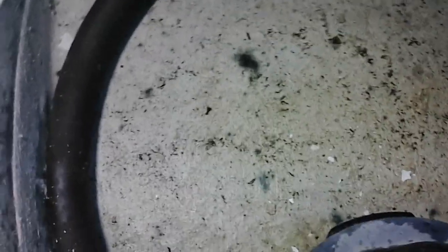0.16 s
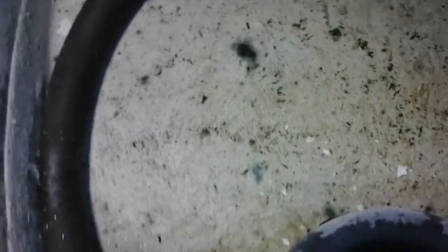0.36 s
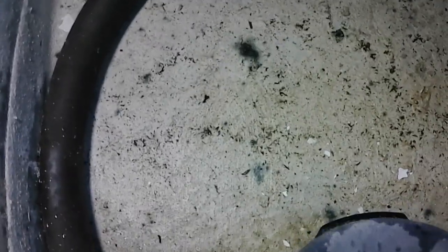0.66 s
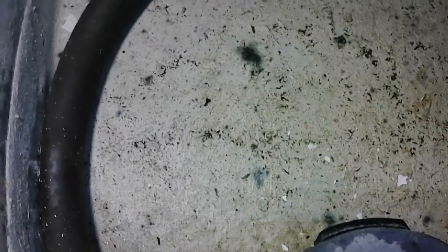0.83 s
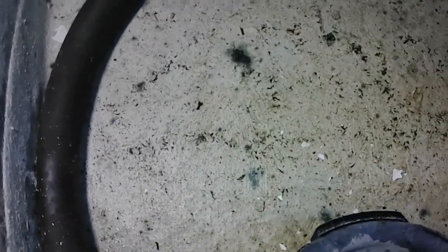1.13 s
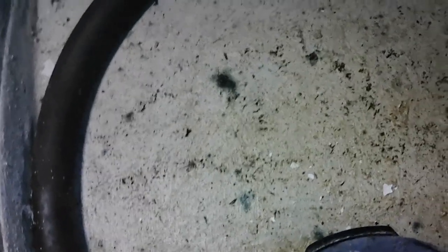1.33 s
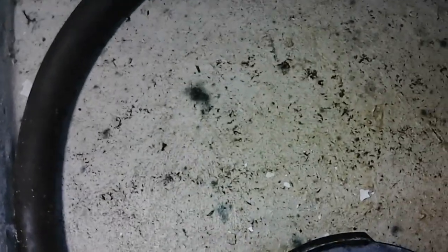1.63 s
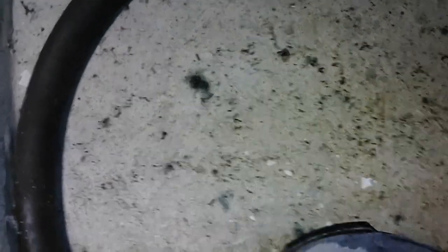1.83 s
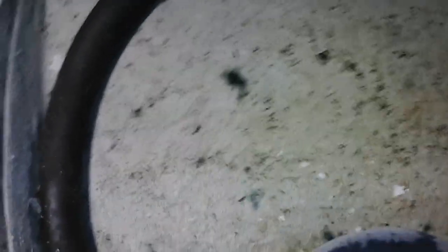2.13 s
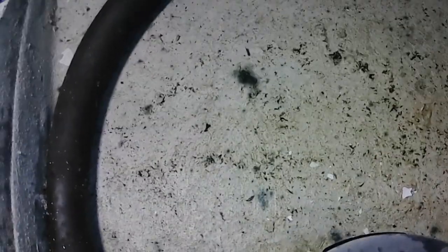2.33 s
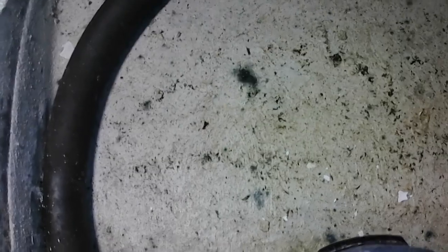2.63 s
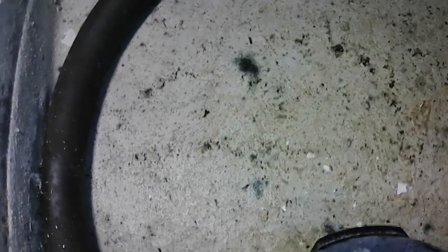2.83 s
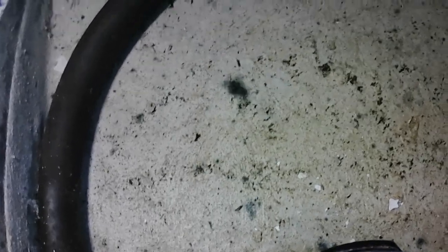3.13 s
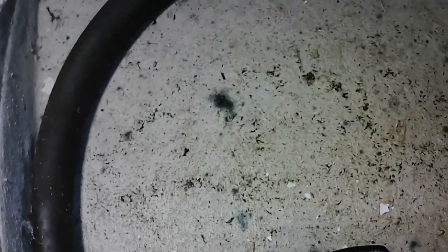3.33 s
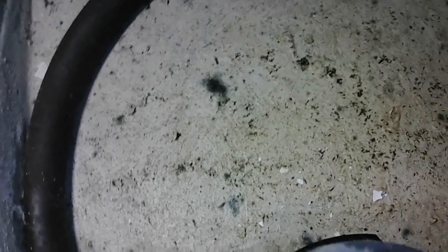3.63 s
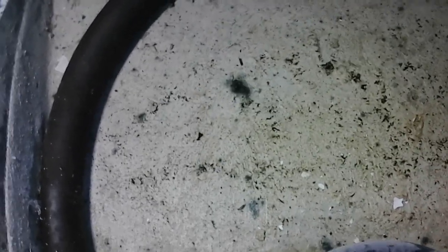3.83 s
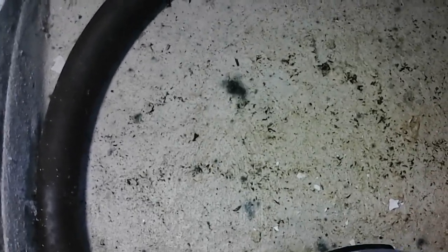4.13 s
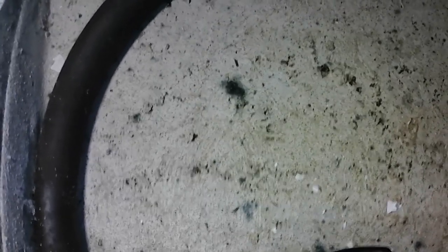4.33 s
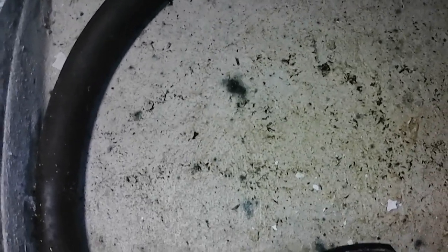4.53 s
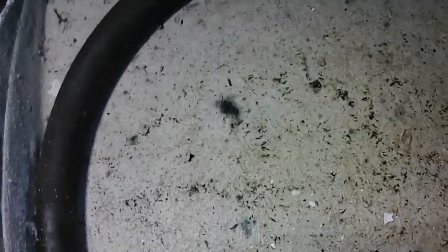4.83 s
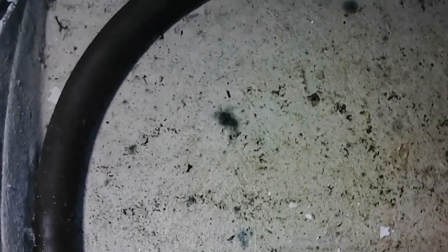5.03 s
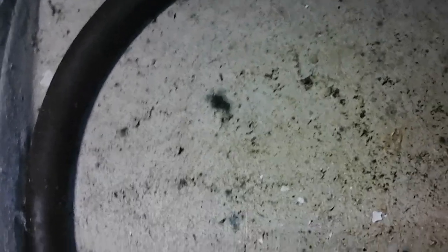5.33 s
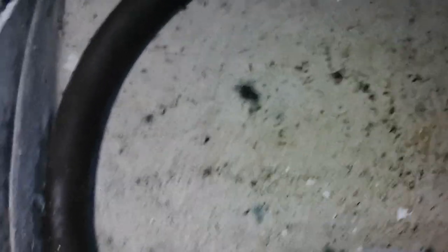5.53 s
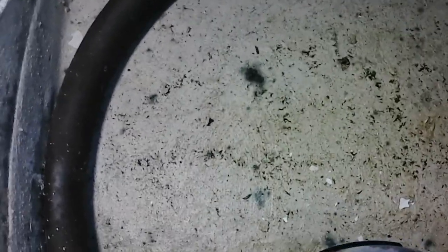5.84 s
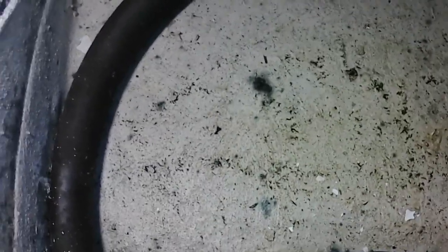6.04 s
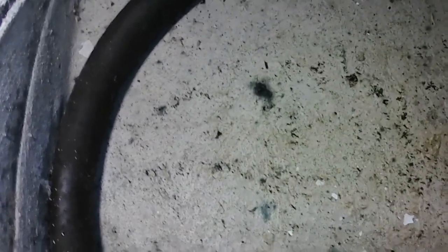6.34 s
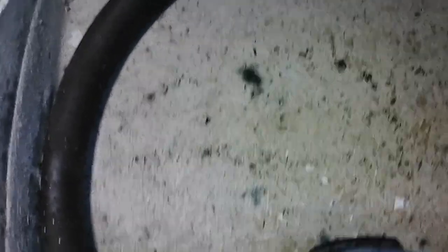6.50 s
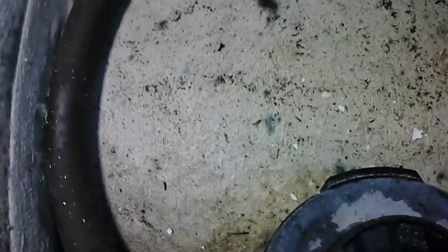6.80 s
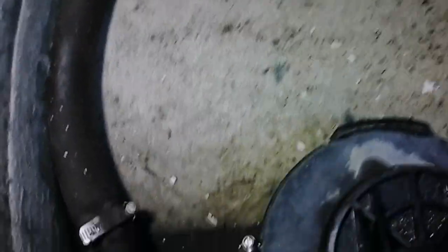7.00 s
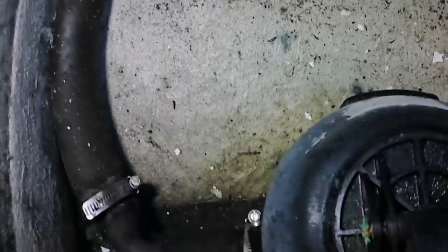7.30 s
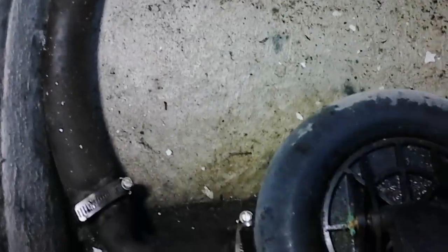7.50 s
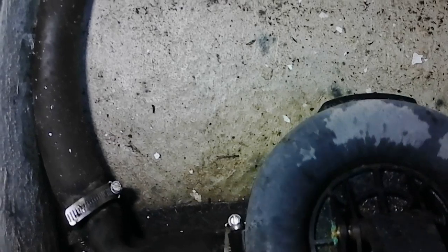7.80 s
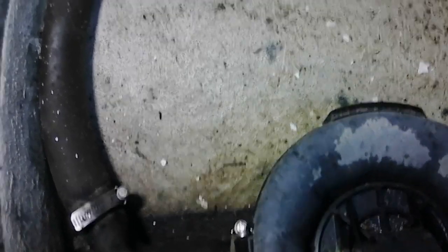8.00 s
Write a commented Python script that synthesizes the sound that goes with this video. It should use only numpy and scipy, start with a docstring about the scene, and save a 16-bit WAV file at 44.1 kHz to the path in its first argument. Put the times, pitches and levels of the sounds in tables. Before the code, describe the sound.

A hand pump draws water through a hose in a boat's bilge, with irregular hollow knocks, gurgling, hissing and sloshing.

```python
"""A hand-worked diaphragm pump down in a boat's bilge, one microphone close by under the deck.
Water is already gurgling and hissing through the hose as the lever knocks the hollow housing;
water sloshes, linkage and grit tick. From 0.8 s the outlet flap slaps open about every 1.8 s,
each stroke pushing out more bubbly water. The hardest knocks, near 2 s and 7.3 s, overload the input."""
import sys
import numpy as np
from scipy import signal
from scipy.fft import rfft, irfft, next_fast_len
from scipy.io import wavfile
from scipy.ndimage import uniform_filter1d

SR = 44100
rng = np.random.default_rng(int(sys.argv[2]) if len(sys.argv) > 2 else 0)


def store_pcm(level_fs):
    """Save levels as 16-bit WAV."""
    pcm = np.round(np.clip(level_fs, -1, 1) * 32767).astype(np.int16)
    wavfile.write(sys.argv[1], SR, np.atleast_2d(pcm).T)


N = 359856

# air pockets of hose and chamber: pitch_hz, nominal_width_hz, level_db
AIR_POCKETS = [(575, 200, 4), (631.5, 18.4, 5.5), (982, 122, 21), (1246, 90, 6.5), (1735, 95, 4),
               (1990, 110, 4)]
# lever stops and jolts of the housing: start_s, peak_db, hardness_db_per_octave, gush_db
LEVER_KNOCKS = [(0.04, -12, -1.5, -42), (0.098, -10.5, -5.5, -58), (0.26, -3.5, -4.5, -45),
                (0.712, -14, 0, -28), (0.936, -10, -4, -25), (1.116, -8.5, -7, -60), (1.2, -11.5, -5, -43),
                (1.856, -6.5, -5, -21), (2.002, -11.5, -3.5, -7.5), (2.008, 5, -3, -23),
                (2.49, -14.5, -2, -30), (2.745, -11.5, -5, -50), (2.889, -8, -4.5, -21),
                (2.988, -11, -7, -14.5), (3.297, -7.5, -3.5, -54), (3.308, -13, -7, -52),
                (3.599, -7, -4.5, -24), (3.625, -11, -8, -36), (3.676, -15, -7, -39), (3.73, -15.5, 3, -19),
                (3.737, -5.5, -3, -39), (3.763, -13, 0.5, -50), (4.458, -14, -0.5, -24.5),
                (4.605, -9.5, -7, -27.5), (4.727, -10.5, -3.5, -43), (5.311, -3.5, -3.5, -17.5),
                (5.444, -3.5, -4, -48), (5.457, -6, -3, -49), (5.503, -19, -10, -56), (6.365, -9, -9, -31),
                (6.446, -9.5, -3, -37), (6.822, -14, 3.5, -50), (6.942, -13, -3, -57),
                (7.162, -4, -3.5, -29), (7.208, -14.5, -4.5, -67), (7.319, -10.5, 0.5, -14.5),
                (7.329, 3, -4, -51), (7.963, -30, 15, -12.5)]
# clear modes of housing and deck: pitch_hz, level_db, t60_s
HOUSING_MODES = [(65.8, -12.5, 0.29), (113.6, -15.5, 0.25), (154.2, -5, 0.14), (211, -9, 0.09),
                 (248, -5.5, 0.13), (337.3, 1.5, 0.11), (440.5, -8.5, 0.13), (506.5, -4.5, 0.15),
                 (572, -1.5, 0.05), (673.6, 3, 0.082), (780, 10.5, 0.015), (1074, -12.5, 0.07)]
# the outlet flap slapping open: start_s, peak_db, gush_db
FLAP_SLAPS = [(0.772, -8, -12.5), (2.5604, 0, -9), (4.2739, 1, -15.5), (6.020, -3, -11.5),
              (7.942, 0.5, -13.5)]


def gain_of(db):
    """Decibels to amplitude."""
    return 10 ** (np.asarray(db) / 20)


def unit_rms(x):
    """Scales to unit rms."""
    return x / np.sqrt(np.mean(x ** 2) + 1e-20)


def curve_at(points, hz):
    """Reads a table on a log-frequency axis."""
    f, value = np.transpose(points)
    return np.interp(np.log(hz + 1), np.log(f + 1), value)


def add(mix, s, sound):
    """Mixes a sound in at time s."""
    part = mix[round(s * SR):][:len(sound)]
    part += sound[:len(part)]


def coloured(points):
    """Steady noise with the given spectrum."""
    size = next_fast_len(N)
    gain = gain_of(curve_at(points, np.fft.rfftfreq(size, 1 / SR)))
    return unit_rms(irfft(rfft(rng.standard_normal(size)) * gain, size)[:N])


def lumps(per_s, spread_db):
    """Sparse random impulses, a few of them large."""
    size = gain_of(spread_db * np.minimum(rng.exponential(1, N), 4)) * rng.choice([-1., 1.], N)
    return size * (rng.random(N) < per_s / SR)


def wobble(seconds, db):
    """A random gain that drifts on the given time scale."""
    size = max(round(seconds * SR), 2)
    drift = uniform_filter1d(uniform_filter1d(rng.standard_normal(N), size), size)
    return gain_of(db * unit_rms(drift))


def ring(hz, db, t60, length_s, contact_s):
    """A sum of dying sines of alternate sign, started softly over the contact time."""
    t = np.arange(round(length_s * SR))[:, None] / SR
    sign = (-1.) ** np.arange(np.size(hz))
    onset = (1 - np.exp(-t / contact_s)) ** 2
    return (sign * gain_of(db - 60 * t / t60) * np.sin(2 * np.pi * hz * t) * onset).sum(1)


def boat_ambience():
    """The quiet, steady background of the boat, mostly low rumble."""
    # noise spectrum: frequency_hz, density_db
    spectrum = [(20, -25.5), (64, 8), (90, -6.5), (160, 1.5), (300, -5.5), (700, -3.5), (1800, -22),
                (2700, -35), (5000, -43.5), (10000, -38.5), (15500, -61)]
    return gain_of(-44) * coloured(spectrum)


def surges():
    """Flow and pressure levels: pressure climbs, the flow waits for the flap, both drift and stop."""
    # surges of gurgling, hissing water through the hose:
    # crest_s, build_s, run_s, flow_db, hiss_db, flow_change_db, hiss_change_db
    water_surges = [(0.039, 0.16, 0.095, -27, -46, -7.5, -15), (0.222, 0.078, 0.071, -20, -59, -9, 8),
                    (0.8, 0.46, 0.23, -25, -43.5, -6, -12), (1.236, 0.12, 0.19, -23.5, -47.5, -5.5, -0.5),
                    (1.47, 0.1, 0.32, -26.5, -57, -13.5, 3.5), (1.93, 0.067, 0.039, -33.5, -85, -25, -3),
                    (2.568, 0.61, 0.24, -32.5, -46.5, 2, -9), (3.039, 0.15, 0.41, -27.5, -47, -11.5, -8.5),
                    (3.362, 0.014, 0.17, -26, -53, -17.5, 1), (4.08, 0.035, 0.069, -41, -77, -8, -13),
                    (4.303, 0.42, 0.24, -23, -43, -13, -19), (4.718, 0.067, 0.59, -27.5, -48, -18, -17),
                    (5.065, 0.11, 0.22, -31.5, -46, -21, -14), (5.7, 0.096, 0.022, -40, -52, -16, -10),
                    (6.057, 0.52, 0.19, -25, -45.5, -5.5, -15), (6.52, 0.15, 0.38, -29.5, -44, -18, -23),
                    (6.779, 0.11, 0.27, -24, -49, -9.5, -11), (7.99, 0.96, 0.13, -54, -51, 30.5, 4)]
    climb_db, open_s, stop_s = 14, 0.07, 0.05
    t = np.arange(0, N / SR, .002)
    power = np.zeros((2, len(t)))
    for crest, build, run, flow_db, hiss_db, flow_change_db, hiss_change_db in water_surges:
        before = np.clip((crest - t) / build, 0, 1)
        after = np.clip((t - crest) / run, 0, 1)
        started = np.clip((t - crest + build) / stop_s + 1, 0, 1)
        moving = started * np.clip(1 - (t - crest - run) / stop_s, 0, 1)
        pressure = gain_of(hiss_db - climb_db * before + hiss_change_db * after) * moving
        opened = np.clip(1 + (t - crest) / min(open_s, build), 0, 1) * moving
        flow = gain_of(flow_db + flow_change_db * after) * opened
        seepage = gain_of(11.5 - 12 * before) * pressure
        power[0] += flow ** 2 + seepage ** 2
        power[1] += pressure ** 2
    return [np.interp(np.arange(N) / SR, t, level) for level in np.sqrt(power)]


def pockets(kicks, modes):
    """Air pockets ring in the hose; each swells and fades on its own and all drift in pitch."""
    out = np.zeros(N)
    for hz, width_hz, db in modes:
        clumps = kicks * wobble(.03, db=2.5)
        out += signal.oaconvolve(clumps, ring(hz, db, 1.29 / width_hz, 0.05, contact_s=.0001))[:N]
    drifting_position = np.cumsum(wobble(.05, db=.35))
    return unit_rms(np.interp(drifting_position, np.arange(N), out, period=N))


def gurgle(level):
    """Bursting bubbles kick the air pockets in clumps; short blips of every size churn among them."""
    water = pockets(lumps(per_s=2000, spread_db=2), AIR_POCKETS)
    blips = np.zeros(N)
    for pitch_hz in np.geomspace(420, 2300, 16):
        cycles = np.arange(round(12 * SR / pitch_hz)) * pitch_hz / SR
        blip = np.sin(2 * np.pi * cycles) * cycles * np.exp(-cycles / 0.72)
        blips += signal.oaconvolve(lumps(per_s=90, spread_db=2.5), blip * (420 / pitch_hz) ** 1.2)[:N]
    return level * unit_rms(wobble(0.018, db=1.15) * (water + 0.45 * unit_rms(blips)))


def hiss(level):
    """Water squeezed past the valve flaps hisses and makes the smallest air pockets swish."""
    # hiss at the valves: frequency_hz, density_db
    spectrum = [(2000, 6.5), (2600, -10), (3200, -9), (3900, -9), (4500, 0.5), (5500, -6), (7000, -8.5),
                (9500, -22), (12000, -25.5), (14500, -29), (15500, -41)]
    swish = pockets(rng.standard_normal(N), AIR_POCKETS[3:])
    return level * wobble(0.013, db=0.97) * (coloured(spectrum) + gain_of(6.5) * swish)


def slosh(flow):
    """Surging water shakes the low modes of the housing, in heaves and faintly with the flow."""
    # heavy water thrown about in the housing: centre_s, level_db, length_s
    heaves = [(0.11, -26, 0.1), (0.269, -17.5, 0.055), (0.812, -24, 0.048), (0.987, -28, 0.27),
              (1.228, -29, 0.13), (2.79, -29.5, 0.4), (3.056, -24.5, 0.056), (3.714, -24, 0.2),
              (4.494, -24.5, 0.07), (5.487, -27.5, 0.14), (5.88, -38.5, 0.1), (6.224, -29, 0.097),
              (7.228, -28.5, 0.16), (8.139, -20.5, 0.018)]
    hz, db, t60 = np.transpose(HOUSING_MODES[1:7])
    kicks = lumps(per_s=200, spread_db=3.3) * wobble(0.012, db=0.32)
    shaken = signal.oaconvolve(kicks, ring(hz, db, 0.42 * t60, 0.34, contact_s=0.0081))[:N]
    t = np.arange(N) / SR
    thrown = sum(gain_of(db) * np.exp(-(2 * (t - s) / length) ** 2) for s, db, length in heaves)
    return (thrown + gain_of(-26) * flow) * unit_rms(shaken)


def glugs():
    """Large bubbles gulp through the hose, each a few soft cycles that glide in pitch."""
    # large bubbles: start_s, peak_db, first_hz, last_hz, length_s
    bubbles = [(.035, -16, 604, 320, 0.046), (1.348, -22.5, 487, 523, 0.025),
               (1.449, -22.5, 478, 598, 0.059), (1.549, -23, 496, 510, 0.028),
               (2.845, -24, 174, 166, 0.051), (6.819, -21.5, 330, 201, 0.07)]
    out = np.zeros(N)
    for start_s, peak_db, first_hz, last_hz, length_s in bubbles:
        progress = np.linspace(0, 1, round(length_s * SR))
        cycles = np.cumsum(first_hz + (last_hz - first_hz) * progress) / SR
        add(out, start_s, gain_of(peak_db) * np.sin(np.pi * progress) ** 2 * np.sin(2 * np.pi * cycles))
    return out


def knocks():
    """A blow and its shudder ring the housing; each spot alters the modes and wakes other panels."""
    # strength of the crowd of weaker panel modes: pitch_hz, level_db
    panel_levels = [(70, -46.5), (150, -22.5), (500, -22.5), (900, -15.5), (1300, -7.5), (1520, -7.5),
                    (1800, -4), (2500, -15.5), (2900, -35), (5000, -24), (8000, -57.5)]
    # their ring times: pitch_hz, t60_s
    panel_decays = [(150, 0.17), (600, 0.18), (2000, 0.027), (5000, 0.016)]
    main_mode_hz, shudder_s = 340, 0.003
    out, t = np.zeros(N), np.arange(3000) / SR
    hz, db, t60 = np.transpose(HOUSING_MODES)
    low_hz, high_hz = panel_levels[0][0], panel_levels[-1][0]
    panels = low_hz * (high_hz / low_hz) ** rng.random((len(LEVER_KNOCKS), 100))
    spots = rng.standard_normal((len(LEVER_KNOCKS), len(hz)))
    jolts = rng.standard_normal((len(LEVER_KNOCKS), len(t)))
    for (start_s, peak_db, hardness, _), panel_hz, spot, jolt in zip(LEVER_KNOCKS, panels, spots, jolts):
        force = 0.021 * jolt * np.exp(-t / shudder_s)
        force[0] = 1  # the blow itself
        tilt_db = hardness * np.log2(np.maximum(np.r_[hz, panel_hz] / main_mode_hz, 1))
        spot_hz = hz * (1 + 0.013 * spot[::-1])
        spot_db = db + 1.7 * spot + tilt_db[:len(hz)]
        spot_t60 = t60 * gain_of(1.5 * np.roll(spot, 3))
        body = ring(spot_hz, spot_db, spot_t60, 0.3, contact_s=0.00046)
        panel_db = curve_at(panel_levels, panel_hz) + tilt_db[len(hz):]
        crowd = ring(panel_hz, panel_db, curve_at(panel_decays, panel_hz), 0.16, contact_s=0.00044)
        fade_out = signal.windows.tukey(2 * len(crowd), .4)[len(crowd):]
        add(body, 0, crowd * fade_out)
        sound = signal.fftconvolve(force, body)
        add(out, start_s, gain_of(peak_db) * sound / abs(sound).max())
    return out


def gushes():
    """Level of the water that spurts at a knock or as a flap opens: a quick start and a slower fade."""
    lead_s = 0.015  # water is already moving before the flap slaps
    rise_s, fade_s = 0.031, 0.036
    out, t = np.zeros(N), np.arange(SR // 2) / SR
    spurts = [(s, db) for s, *_, db in LEVER_KNOCKS] + [(s - lead_s, db) for s, _, db in FLAP_SLAPS]
    for start_s, gush_db in spurts:
        add(out, start_s, gain_of(gush_db) * (1 - np.exp(-t / rise_s)) * np.exp(-t / fade_s))
    return out


def under_deck(x):
    """Reflections in the tight space under the deck, each band dying at its own speed."""
    # reverberation: frequency_hz, t60_s
    decays = [(100, 0.29), (500, 0.23), (2000, 0.22), (8000, 0.055)]
    taps = np.zeros(SR // 2)
    at = np.arange(120, len(taps) - 20, 20)
    taps[at + rng.integers(0, 20, len(at))] = rng.choice([-1., 1.], len(at))
    hz, t, bands = signal.stft(taps, SR, nperseg=256)
    fade = gain_of(-60 * t / curve_at(decays, hz)[:, None])
    tail = signal.istft(bands * fade, SR, nperseg=256)[1]
    return signal.fftconvolve(x, tail / np.linalg.norm(tail))[:N]


def ticks():
    """Linkage and grit tick: a short ring and a brief crack among duller rebounds."""
    # small hard contacts: start_s, peak_db, pitch_hz, brightness_db_per_octave
    contacts = [(.132, -23, 1900, -56), (0.2272, -6, 2380, -18.5), (0.2644, -4, 950, -18),
                (0.379, -20, 1020, -22), (0.788, -8, 660, -21), (0.837, -9, 780, -23),
                (1.59, -19, 1010, -16), (2.0116, -5.5, 2370, -25), (2.024, -19, 1980, -15),
                (3.308, -25, 1950, -22), (3.415, -21, 2140, -26), (3.623, -18.5, 1940, -56),
                (3.738, -16, 2206, -20), (5.189, -20.5, 1810, -40), (5.315, -15, 2343, -33.5),
                (5.4694, -1, 2370, -13), (6.986, -12.5, 1060, -38.5), (7.208, -15, 1300, -24),
                (7.325, -12.5, 2480, -22), (7.336, -13.5, 2400, -18), (7.778, -3.5, 930, -12.5),
                (8.127, -6.5, 960, -17)]
    rebound_s, dull_hz = 0.001677, 3200
    out, t = np.zeros(N), np.arange(1000) / SR
    cracks = rng.standard_normal((len(contacts), len(t)))
    hz = np.fft.rfftfreq(len(t), 1 / SR)
    dull = 1 / (1 + (hz / dull_hz) ** 6)
    shares = [0.45 * dull, 1, 0.34 * dull, 0.36 * dull]
    rebounds = sum(share * np.exp(-2j * np.pi * hz * (k + .5) * rebound_s)
                   for k, share in enumerate(shares))
    envelope = np.minimum(t / .0008, 1) ** 2 * (1 - t / t[-1]) ** 2
    for (start_s, peak_db, pitch_hz, brightness), crack in zip(contacts, cracks):
        octaves = np.log2(hz / pitch_hz + 1e-3)
        slope_db = np.where(octaves > 0, brightness, 18.0) * octaves
        force = (t == 0) + .4 * crack * np.exp(-t / .001)
        hit = rfft(force) / (1 + (hz / 9000) ** 2)
        snap = irfft(hit * gain_of(slope_db) * rebounds, len(t)) * envelope
        sound = ring(pitch_hz, 1.4, 0.016, len(t) / SR, contact_s=0.0011) + snap / abs(snap).max()
        add(out, start_s, gain_of(peak_db) * sound / abs(sound).max())
    return out


def flaps():
    """The outlet flap opens with a short hollow slap, slightly different at each stroke."""
    # modes of the slap: pitch_hz, level_db, t60_s
    modes = [(166, -7, 0.056), (536, -1, 0.018), (668, -2, 0.023), (985, -22.5, 0.059), (1300, -25, .05)]
    hz, db, t60 = np.transpose(modes)
    out = np.zeros(N)
    for start_s, peak_db, _ in FLAP_SLAPS:
        spot = rng.standard_normal(len(hz))
        sound = ring(hz * (1 + 0.04 * spot[::-1]), db + 2.5 * spot, t60, 0.3, contact_s=0.0003)
        add(out, start_s, gain_of(peak_db) * sound / abs(sound).max())
    return out


def scene():
    """At the microphone: blows with their echoes, water, and the quiet background of the boat."""
    blows = knocks() + flaps()
    snaps = ticks()
    echoes = under_deck(gain_of(-8) * blows + gain_of(-26) * snaps)
    gush = gushes()
    flow, pressure = surges()
    idle_hiss_db = -63
    water = gurgle(flow + gush) + hiss(pressure + gain_of(idle_hiss_db) + gain_of(-44) * gush)
    return (blows + snaps + echoes + water + glugs() + slosh(flow) + boat_ambience())[None]


def record(dry):
    """The microphone drops the deepest bass, the input clips at full scale, the top treble is cut."""
    low_cut_hz, high_cut_hz = 88, 15700
    thinned = signal.sosfilt(signal.butter(2, low_cut_hz, "high", fs=SR, output="sos"), dry)
    clipped = np.clip(thinned, -1, 1)
    band_limit = signal.firwin(511, high_cut_hz, window=("kaiser", 9), fs=SR)
    return signal.oaconvolve(clipped, band_limit[None], "same")


dry = scene()
out = record(dry)
store_pcm(out)
```